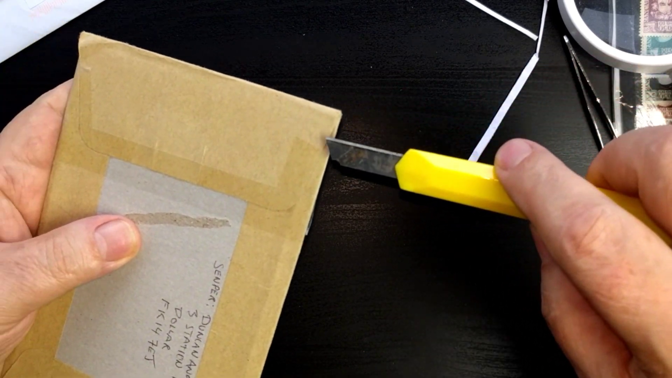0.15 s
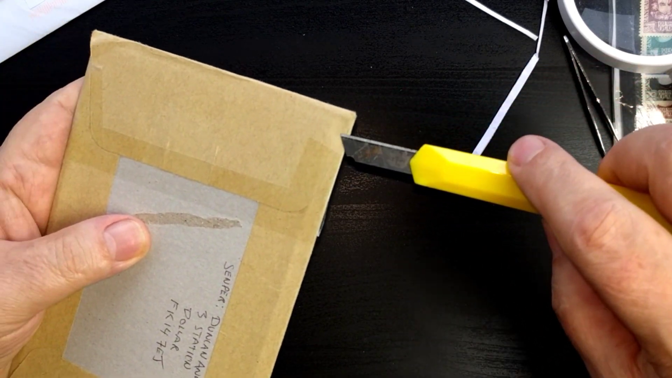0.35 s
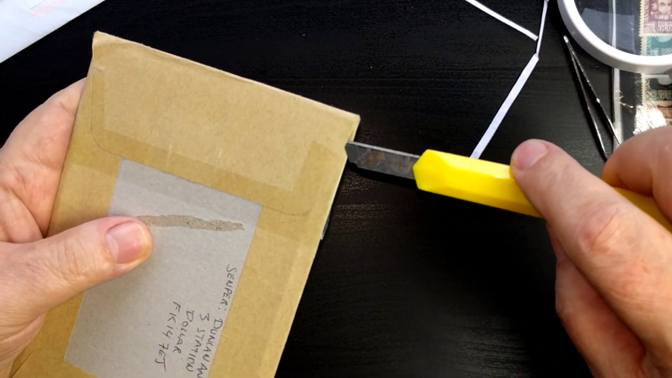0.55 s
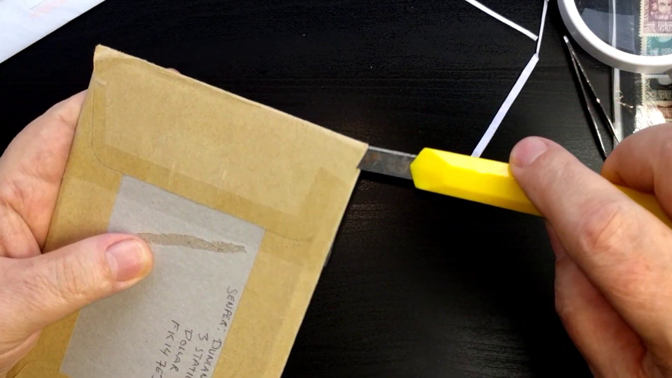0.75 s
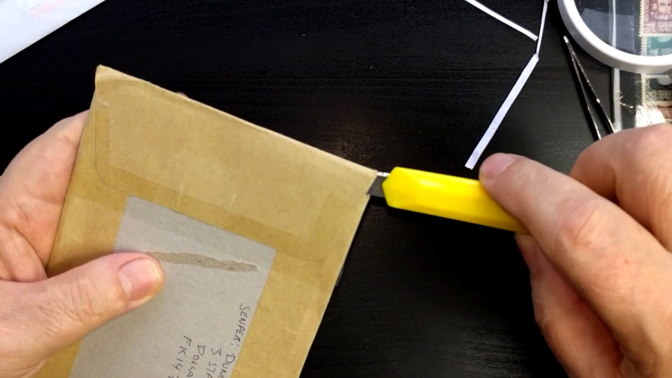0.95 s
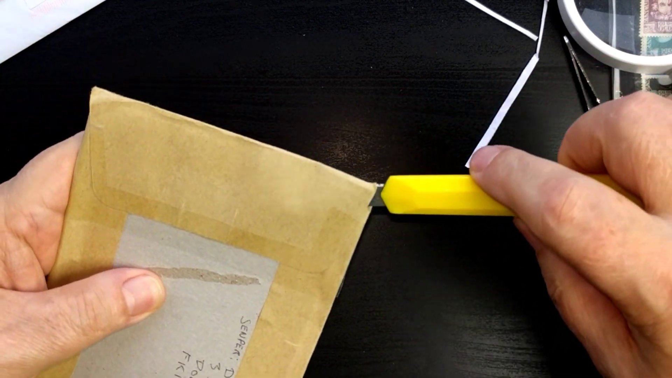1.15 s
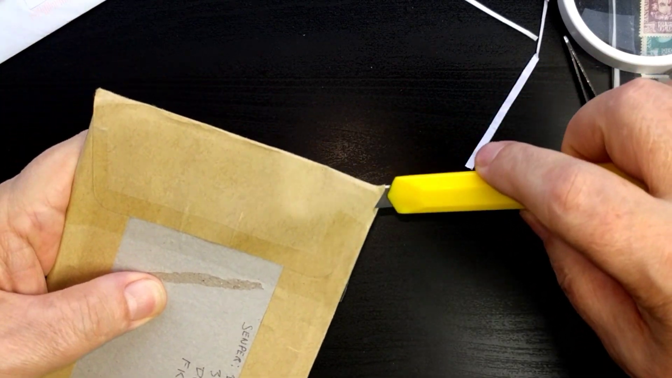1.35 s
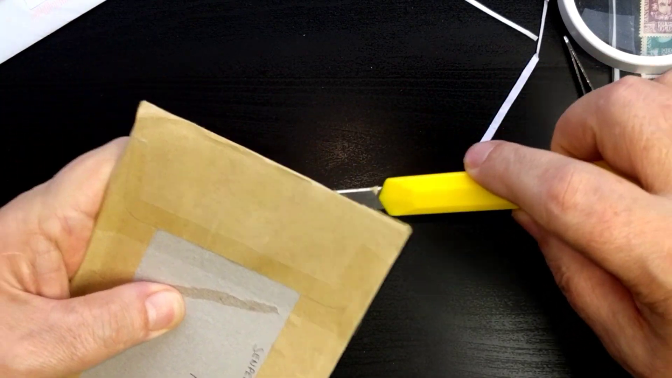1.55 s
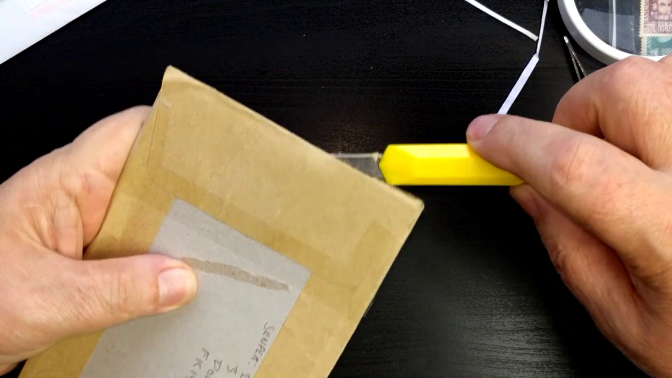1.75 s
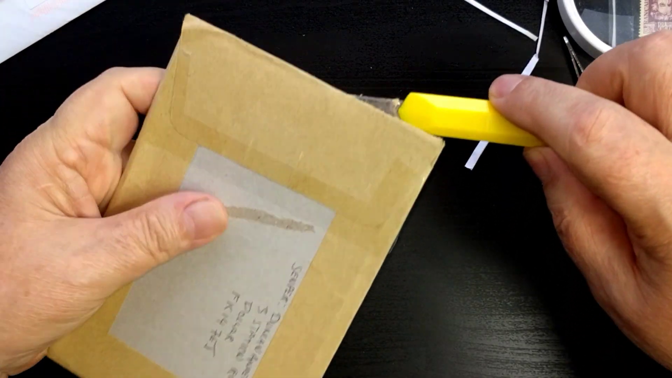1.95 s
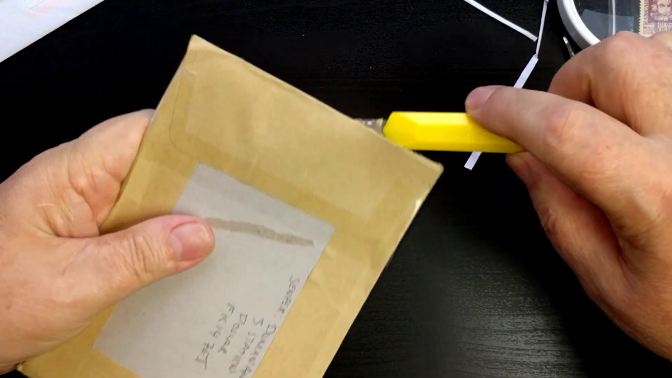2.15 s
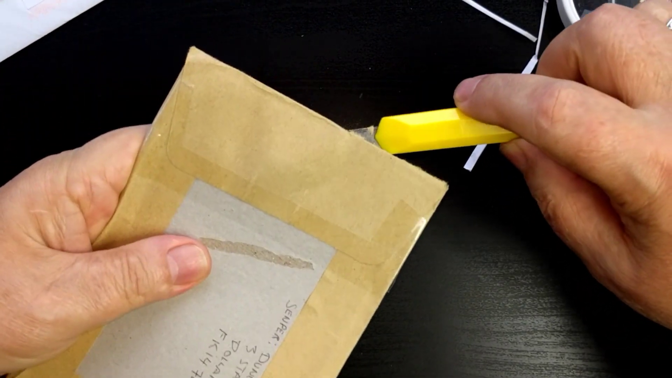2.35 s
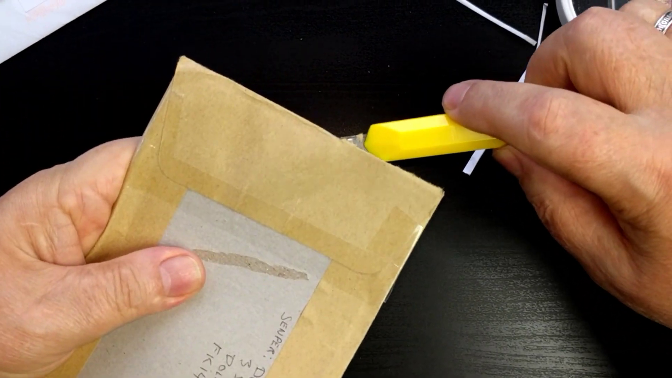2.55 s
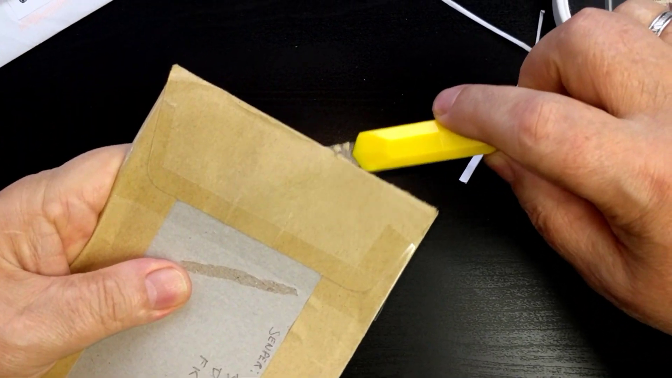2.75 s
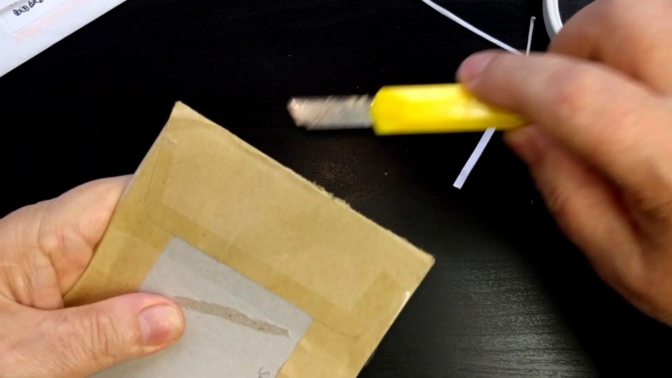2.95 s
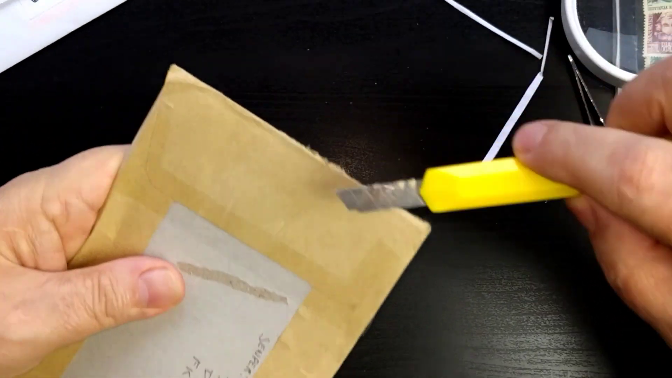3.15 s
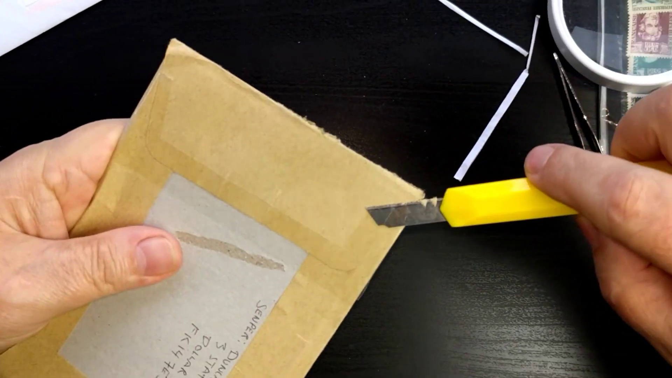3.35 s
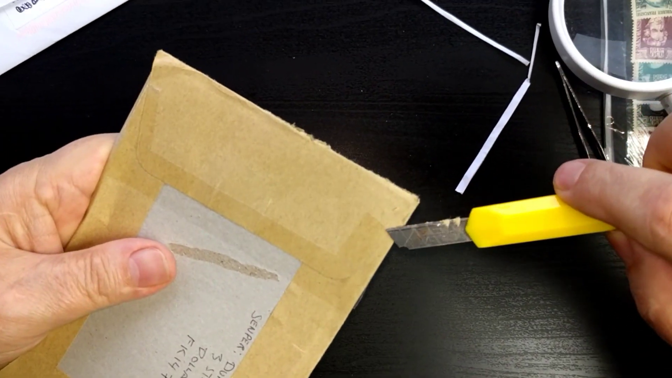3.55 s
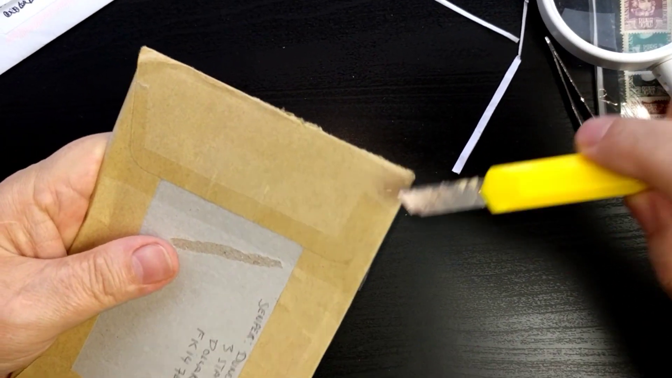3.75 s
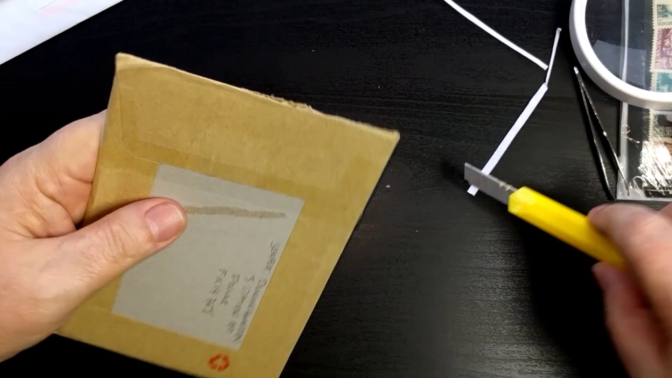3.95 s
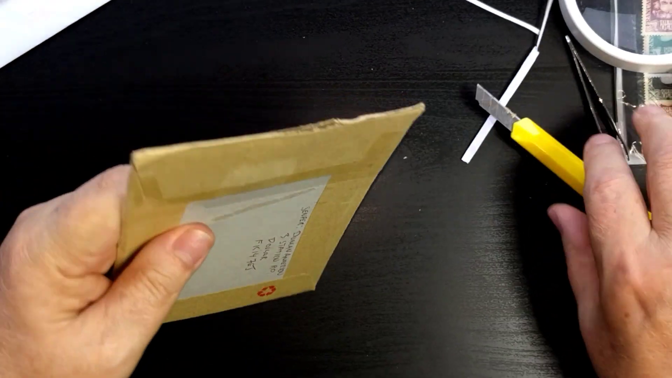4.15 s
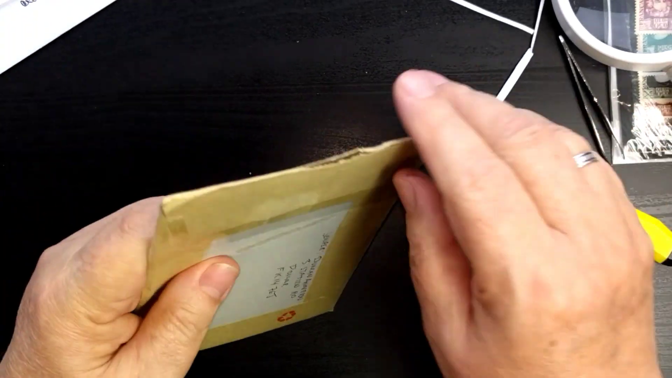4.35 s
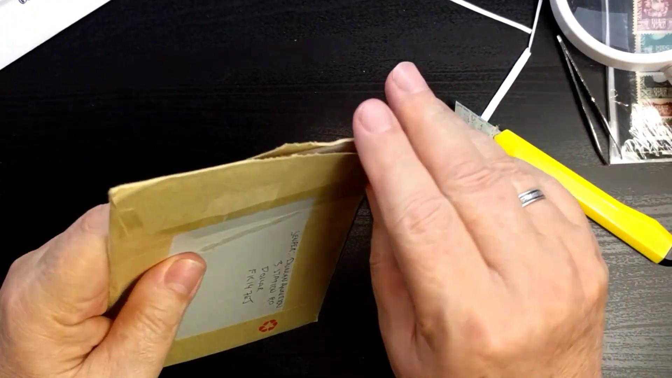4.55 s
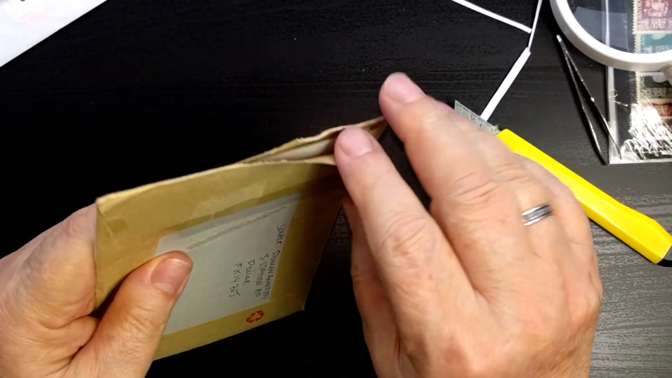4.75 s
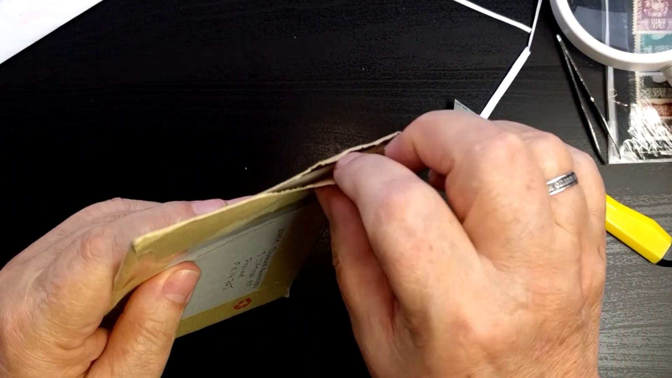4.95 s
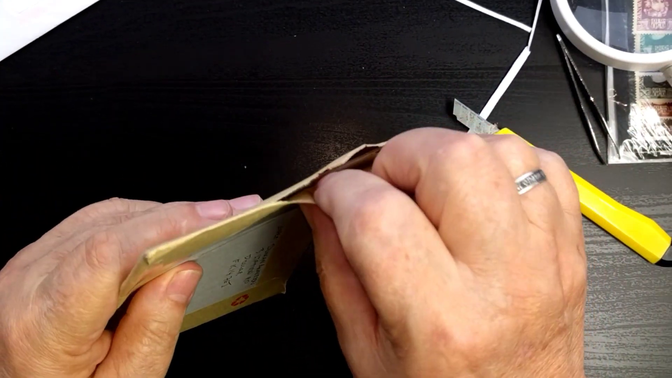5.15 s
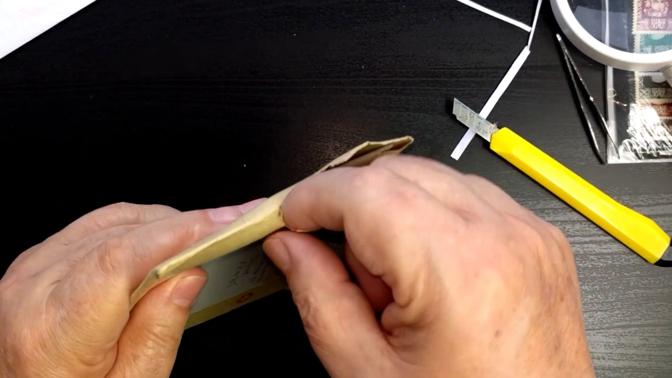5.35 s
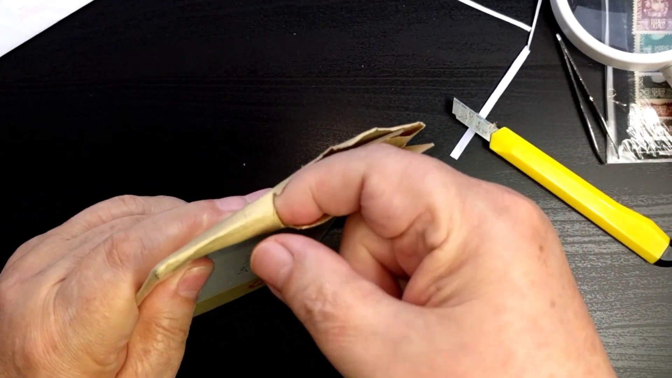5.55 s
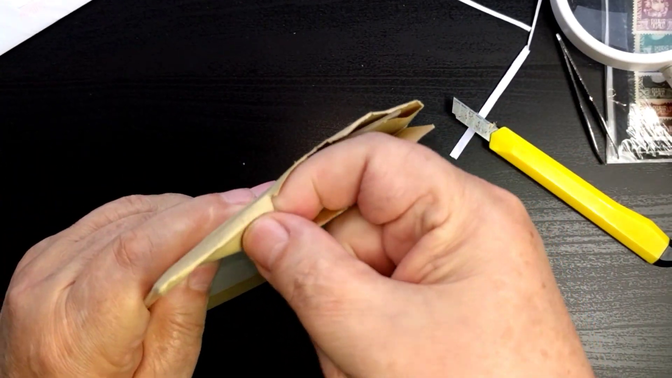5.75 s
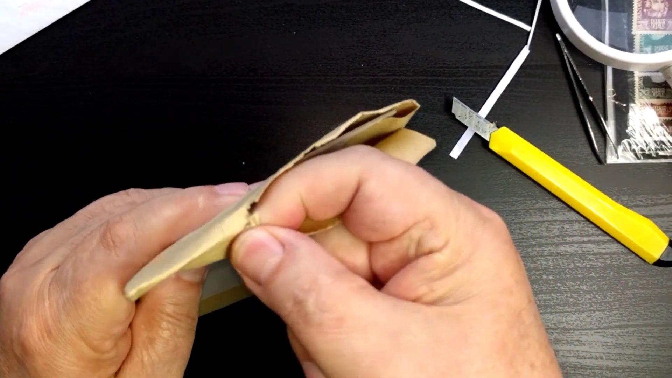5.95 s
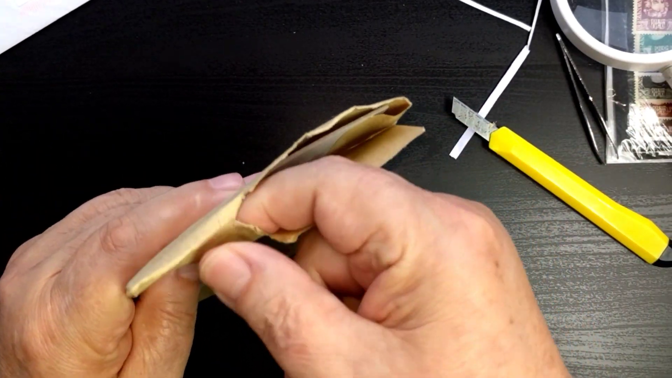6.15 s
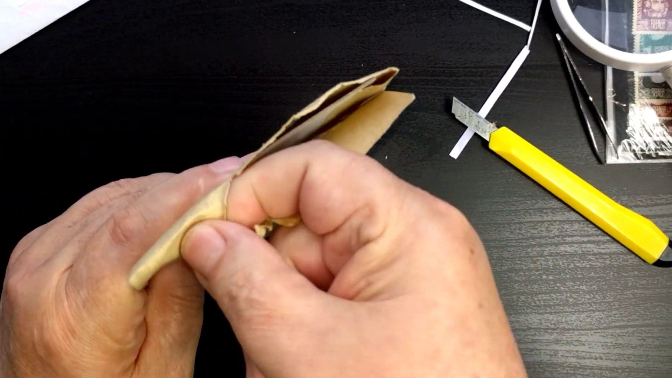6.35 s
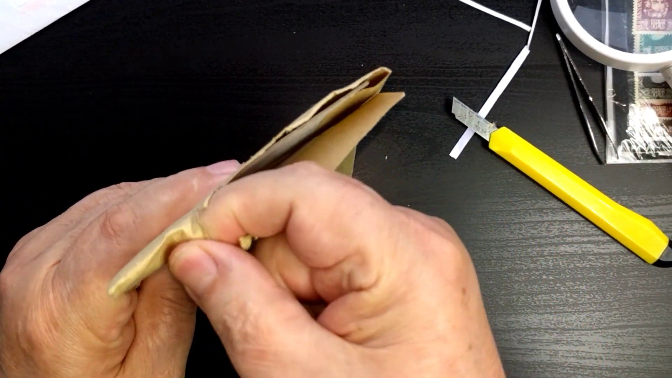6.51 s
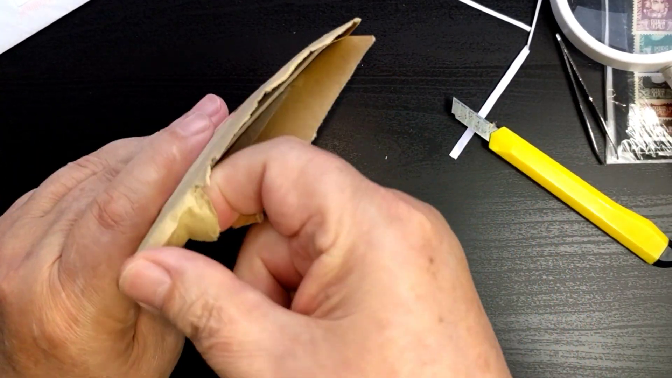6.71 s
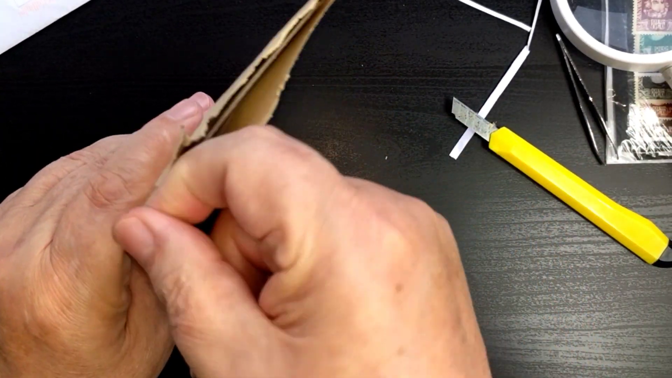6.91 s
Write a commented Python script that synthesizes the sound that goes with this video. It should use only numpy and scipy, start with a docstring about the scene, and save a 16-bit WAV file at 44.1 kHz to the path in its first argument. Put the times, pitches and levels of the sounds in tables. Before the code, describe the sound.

Close blade scrapes and rips in stiff paper, a knife clattering down, then crackling hand tearing, with a low hum behind.

```python
"""Close up, a snap-off knife ticks, slides, saws and rips through the top fold of a stiff paper envelope.
At about 4 s a hand drags over the desk and the knife clatters down.
Fingers then rub the paper and tear it open: fibres snap, the hollow deepens, the wall pops through.
Throughout, a small room answers and a low drone, like a distant engine, wavers behind."""
import sys
import numpy as np
from scipy import signal
from scipy.fft import rfft, irfft, next_fast_len
from scipy.io import wavfile
from scipy.ndimage import map_coordinates

SR = 44100
rng = np.random.default_rng(int(sys.argv[2]) if len(sys.argv) > 2 else 0)


def digitize_waveform(pressure):
    """Quantize a signal to 16-bit integers and store it at the path in sys.argv[1].

    Rows of a 2-D input are taken as channels; values are limited to [-1, 1].
    """
    field = np.atleast_2d(pressure).T
    bounded = np.clip(field, -1, 1)
    quanta = np.round(bounded * 32767).astype(np.int16)
    wavfile.write(sys.argv[1], SR, quanta)


N = 307818

# blade strokes: start_s, end_s, level_db, body_db
SLIDES = [(0.125, 0.23, -50.5, -2), (0.45, 0.525, -53, 4), (0.53, 0.6, -50.5, 2), (0.61, 0.83, -52.5, 2.5),
          (0.82, 0.93, -45.5, -0.5), (0.91, 1.015, -40, -3), (1.06, 1.2, -41.5, 9), (1.17, 1.36, -46, 7.5),
          (1.39, 1.43, -39.5, 2.5), (1.48, 1.515, -27.5, 1), (1.78, 2.03, -48, 8),
          (1.885, 1.975, -47, -6.5), (1.96, 2.24, -44.5, 1.5), (2.1, 2.14, -38.5, -6),
          (2.185, 2.3, -34.5, -1), (2.27, 2.41, -54.5, 7), (2.385, 2.47, -42, 0), (2.76, 2.805, -41, -3),
          (2.91, 3.02, -42, -4), (3.115, 3.19, -51.5, 9), (3.69, 3.76, -48, -1), (3.78, 4.05, -49, 1.5),
          (4.17, 4.24, -37, 1.5)]
# friction spectrum: freq_hz, gain_db
SLIDE_TONE = [(180, -56), (300, -12.5), (678, -12.5), (885, -8.5), (1480, -12), (2170, -6), (3400, -3),
              (5900, -4.5), (6410, -6), (14200, -9), (16000, -9.5)]
def slides():
    """The blade slides in the fold, with tiny gritty catches along each stroke."""
    slide = strokes(SLIDES, SLIDE_TONE, breaks_per_s=3500, spread_db=3.8, hiss=0.44, attack_share=0.56,
                    edge_db=9, judder_db=1.3, ripple_db=1.5, taper=0.43)
    catches = scattered(SLIDES, per_s=17, over_db=-1.5)
    grit = clicks(catches, TICK_TONE, rise_s=0.00026, ripple_db=10.5, ring_db=-32, ring_t60_s=0.015)
    return amp(0.63) * slide + grit


# saw strokes: start_s, end_s, level_db, body_db
CUTS = [(1.592, 1.71, -28, -3), (2.653, 2.732, -37, -1)]
# taut fold resonances: centre_hz, width_hz, gain_db
RASP = [(3350, 400, 9), (4100, 440, 5)]
def sawing():
    """The blade saws steadily; the taut fold rasps under the edge."""
    return amp(1.4) * strokes(CUTS, SLIDE_TONE, breaks_per_s=4700, spread_db=4, hiss=0.62,
                              attack_share=0.38, edge_db=8, judder_db=-0.5, ripple_db=2.4, modes=RASP)


# blade catches: time_s, level_db, body_db
TICKS = [(0.127, -45.5, 5), (0.3089, -27.5, -3), (0.5898, -31.5, 6), (0.8638, -25, -7), (1.0572, -29, 0),
         (1.4685, -41, -4), (1.5385, -17.5, -5), (1.7248, -32, -2), (2.2656, -30.5, -10),
         (2.4228, -22, 0.5), (2.4577, -23.5, 0), (2.5932, -34.5, -12), (2.7608, -31.5, 0),
         (3.1119, -28, -1.5), (3.4, -17.5, -7), (3.6233, -26.5, -8.5), (3.8329, -33, -5),
         (3.8981, -28.5, -10), (3.9899, -31.5, 6), (4.021, -31, -1), (4.0613, -31.5, -2)]
# catch spectrum: freq_hz, gain_db
TICK_TONE = [(150, -60), (250, -17), (510, -18.5), (875, -12.5), (1220, -18), (3120, -4.5), (4050, -9.5),
             (4900, -0.5), (7310, -7.5), (16000, -16)]
def ticks():
    """The blade catches on the paper's edge."""
    return amp(-0.9) * clicks(TICKS, TICK_TONE, rise_s=0.00096, ripple_db=2.6,
                              ring_db=-9, ring_t60_s=0.048, softness=0.99)


# blade glide: time_s, pitch_hz, level_db
ZIP = [(2.654, 2092, -44), (2.68, 3200, -43), (2.701, 3810, -31.5), (2.732, 4950, -54)]
def zipping(width_hz=2500):
    """A rough band glides upward as the blade gathers speed."""
    time_s, pitch_hz, level_db = np.transpose(ZIP)
    out, t = np.zeros(N), np.arange(time_s[0], time_s[-1], 1 / SR)
    phase = 2 * np.pi * np.cumsum(np.interp(t, time_s, pitch_hz)) / SR
    band = wobble(width_hz, len(t)) * np.sin(phase) + wobble(width_hz, len(t)) * np.cos(phase)
    swell = amp(np.interp(t, time_s, level_db)) * signal.windows.tukey(len(t), 0.1)
    add(out, time_s[0], swell * unit(band))
    return out


# fold giving way: start_s, end_s, level_db, body_db
RIPS = [(0.164, 0.182, -29, -2), (1.497, 1.516, -22, -1), (1.511, 1.525, -25.5, -2.5),
        (1.524, 1.538, -22.5, -3.5), (1.756, 1.768, -33.5, 0), (1.77, 1.78, -29, -1.5),
        (2.861, 2.926, -21.5, 0), (2.894, 2.906, -20, -7), (5.404, 5.42, -26.5, 2), (6.451, 6.469, -25, 8),
        (6.604, 6.618, -36, -0.5), (6.881, 6.892, -20.5, 5), (6.891, 6.904, -22, 1.5)]
# rip spectrum: freq_hz, gain_db
RIP_TONE = [(90, -24), (150, -15), (328, -19.5), (805, -8.5), (1080, -13), (1750, -7.5), (3400, -2.5),
            (4490, -5.5), (5400, -1), (6200, -5), (13400, -5.5), (16000, -7.5)]
# fold tension as the slit grows: time_s, taut_share
TAUTNESS = [(1.6, 1), (2.8, 0)]
def rips():
    """Dense, surging runs of breaks ring the taut fold or, once it is open, the hollow."""
    out = np.zeros(N)
    for start_s, end_s, level_db, body_db in RIPS:
        size = round((end_s - start_s) * SR)
        surge = amp(2.9 * wobble(347, size)) * signal.windows.tukey(size, min(1, 0.0074 * SR / size))
        drive = unit(surge * fibres(size, breaks_per_s=6000, spread_db=4.5, hiss=0.45))
        if openness(start_s):
            modes, depth = hollow(start_s), 0.7
        else:
            modes, depth = RASP, 0.55 * np.interp(start_s, *np.transpose(TAUTNESS))
        response = impulse_response(RIP_TONE, body_db, ripple_db=2.1, modes=modes, depth=depth)
        add(out, start_s, amp(level_db) * signal.fftconvolve(drive, response))
    return amp(0.03) * out


# finger strokes: start_s, end_s, level_db, body_db
RUBS = [(4.578, 4.704, -51.5, 0), (4.711, 4.81, -46, -0.5), (4.844, 4.972, -45, -2.5),
        (4.965, 5.115, -47.5, 0), (5.108, 5.247, -44, -4), (5.236, 5.385, -41, -3), (5.828, 5.88, -43, 2.5),
        (5.953, 6.034, -38.5, 3.5), (6.131, 6.252, -45, 3), (6.674, 6.796, -33.5, 1.5),
        (6.816, 6.965, -35.5, -1)]
# envelope shifting: start_s, end_s, level_db, body_db
HANDLING = [(4.7, 7.1, -50, 6.5)]
# rub spectrum: freq_hz, gain_db
RUB_TONE = [(210, -49), (350, -7), (1140, -9), (1650, -4.5), (2940, -6), (4600, -5), (11800, -6),
            (14500, -3.5), (16000, -9.5)]
def rubbing():
    """Skin and paper rub on paper while the envelope shifts faintly between the hands."""
    rub = sum(strokes([row], RUB_TONE, breaks_per_s=1300, spread_db=1.5, hiss=0.62, attack_share=0.31,
                      edge_db=8, judder_db=1.5, ripple_db=-0.05,
                      modes=hollow(row[0]), depth=openness(row[0])) for row in RUBS)
    shifting = strokes(HANDLING, RUB_TONE, breaks_per_s=260, spread_db=3, hiss=0.83, attack_share=0.77,
                       edge_db=13, judder_db=3.5, ripple_db=-1, modes=hollow(HANDLING[0][1]), depth=0.48)
    return amp(0.87) * rub + shifting


# finger tears: start_s, end_s, level_db, body_db
TEARS = [(5.362, 5.5, -33, -1.5), (5.531, 5.643, -33, 0), (5.641, 5.809, -47, 5.5),
         (6.024, 6.107, -38.5, -9), (6.173, 6.243, -31.5, -6.5), (6.3, 6.434, -35, -4.5),
         (6.425, 6.512, -29.5, 2.5)]
# tear spectrum: freq_hz, gain_db
TEAR_TONE = [(210, -35), (350, -8), (530, -6), (990, -15.5), (2200, 0.5), (3980, -2.5), (7080, -2.5),
             (9290, -6), (13600, 2), (16000, 1.5)]
# crease and bundle breaks: time_s, level_db, body_db
SNAPS = [(5.4259, -15, -0.5), (5.4362, -20, -7), (5.4685, -36, -11), (5.5312, -19.5, 5), (5.5533, -27, -10),
         (5.5643, -21.5, -7.5), (5.7252, -27.5, 2), (6.04, -7.5, 6), (6.0469, -15, -12), (6.054, -22, -8),
         (6.2182, -24, 2), (6.2417, -25.5, -4), (6.31, -21, -5), (6.3165, -17, -10), (6.337, -23, -10),
         (6.3636, -12, -0.5), (6.3827, -19, 0.5), (6.512, -14.5, 11.5), (6.8406, -26, 7),
         (6.8694, -21.5, 4)]
# snap spectrum: freq_hz, gain_db
SNAP_TONE = [(100, -38), (400, -6.5), (1000, -7.5), (2400, -5), (4500, -11.5), (7000, -5.5), (10000, -6),
             (14000, -1.5), (16000, 1.5)]
def tearing():
    """A finger tears the fold fibre by fibre; creases and fibre bundles snap and crackle."""
    tear = sum(strokes([row], TEAR_TONE, breaks_per_s=520, spread_db=3.3, hiss=0.43, attack_share=0.48,
                       edge_db=7, judder_db=1.5, ripple_db=2.2, modes=hollow(row[0]), depth=0.53)
               for row in TEARS)
    snaps = sum(clicks([row], SNAP_TONE, rise_s=0.0004, ripple_db=4.5, ring_db=-14, ring_t60_s=0.039,
                       modes=hollow(row[0]), depth=0.52) for row in SNAPS)
    small_snaps = scattered(TEARS, per_s=42, over_db=4)
    crackle = clicks(small_snaps, SNAP_TONE, rise_s=0.00017, ripple_db=4, ring_db=-28, ring_t60_s=0.015)
    return amp(0.2) * tear + amp(0.1) * snaps + crackle


# envelope mouth: time_s, open_share
OPENING = [(5.0, 0), (6.1, 1)]
def openness(time_s):
    """How far the mouth is open, 0 to 1."""
    return np.interp(time_s, *np.transpose(OPENING))


# cavity resonances: shut_hz, open_hz, width_hz, gain_db
HOLLOW = [(2270, 2120, 240, 9), (3620, 2955, 380, 14)]
def hollow(time_s):
    """The envelope's cavity resonances fall as it opens."""
    return [(shut_hz + (open_hz - shut_hz) * openness(time_s), width_hz, gain_db)
            for shut_hz, open_hz, width_hz, gain_db in HOLLOW]


# envelope jerks: time_s, level_db, centre_hz
POPS = [(1.112, -32.5, 1550), (2.4558, -34.5, 1120), (2.759, -39.5, 322), (5.6142, -29, 490),
        (6.0405, -31.5, 620)]
# pop spectrum: centre_ratio, gain_db
POP_TONE = [(.2, -31), (.65, 0.5), (1.25, 3), (2, -10.5), (6, -12.5), (30, -52)]
def pops():
    """The envelope jerks in the grip with dull, unpitched puffs."""
    out = np.zeros(N)
    for time_s, level_db, centre_hz in POPS:
        tone = [(centre_hz * ratio, gain_db) for ratio, gain_db in POP_TONE]
        out += clicks([(time_s, level_db, 0)], tone, rise_s=0.0018, ripple_db=4,
                      ring_db=-35, ring_t60_s=0.018)
    return out


# envelope wall modes: freq_hz, gain_db, t60_s
WALL_MODES = [(1280, -16, 0.0094), (2000, -3.5, 0.012), (2174, 0.5, 0.017), (2650, -0.5, 0.011),
              (5600, -2.5, 0.0035), (6170, -11, 0.0097)]
def buckle(time_s=6.1172, gain_db=-10):
    """The bowed wall flips over and rings briefly."""
    out, t = np.zeros(N), np.arange(SR // 10) / SR
    ring = sum(amp(db - 60 * t / t60_s) * np.sin(2 * np.pi * hz * t) for hz, db, t60_s in WALL_MODES)
    attack = 1 - np.exp(-t / 0.00016)
    add(out, time_s, amp(gain_db) * ring * attack)
    return out


# hand drag: start_s, end_s, level_db, body_db
DRAGS = [(3.5, 4.1, -52, 2.5)]
# desk top resonances: centre_hz, width_hz, gain_db
DESK_MODES = [(450, 210, 14), (1456, 91, 15.5), (1780, 180, 13.5), (2530, 310, 4.5)]
def hand_drag():
    """The hand judders over the desk and excites its top."""
    return strokes(DRAGS, SLIDE_TONE, breaks_per_s=2600, spread_db=15, hiss=0.69, attack_share=0.86,
                   edge_db=7, judder_db=6, ripple_db=0.5, modes=DESK_MODES)


# knife on desk: time_s, level_db
KNIFE_HITS = [(4.1025, -11), (4.1367, -26.5), (4.2355, -10), (4.2466, -11.5), (4.3139, -14.5),
              (4.3379, -19), (4.3569, -22), (4.4268, -20)]
# contact spectrum: freq_hz, gain_db
KNIFE_TONE = [(88, -19), (160, -15), (300, -8), (566, -15), (830, -10.5), (1250, -9.5), (1830, -3),
              (5150, -4), (11000, -5.5), (16000, -4.5)]
# handle and blade resonances: centre_hz, width_hz, gain_db
KNIFE_MODES = [(2380, 600, 2), (5230, 750, 4.5), (8750, 800, 5.5)]
def knife_clatter(first_body_db=-6.5, body_db_per_s=45.5):
    """The knife rocks to rest, steel tip first, then plastic handle: each contact is duller."""
    contacts = [(time_s, level_db, first_body_db + body_db_per_s * (time_s - KNIFE_HITS[0][0]))
                for time_s, level_db in KNIFE_HITS]
    return clicks(contacts, KNIFE_TONE, rise_s=0.0021, ripple_db=2, ring_db=-7.5, ring_t60_s=0.092,
                  softness=1.6, modes=KNIFE_MODES)


# room decay: freq_hz, t60_s
ROOM_T60 = [(300, 0.96), (1000, 0.46), (5000, 0.3346), (15000, 0.22)]
# room spectrum: freq_hz, gain_db
ROOM_TONE = [(200, -5.5), (1000, 3), (2500, -2.5), (5500, -1.5), (9000, -2), (16000, -1)]
def room(x, spans=28, delay_s=0.005):
    """A diffuse tail, each frequency dying at its own speed, drawn afresh per span to stay smooth."""
    out = np.zeros(N)
    for span in np.array_split(np.arange(N), spans):
        hz, t, noise = signal.stft(rng.standard_normal(SR // 2), SR, nperseg=256)
        decay = amp(along(ROOM_TONE, hz)[:, None] - 60 * t / along(ROOM_T60, hz)[:, None])
        tail = signal.istft(noise * decay, SR, nperseg=256)[1]
        add(out, span[0] / SR + delay_s, signal.fftconvolve(x[span], tail / np.linalg.norm(tail)))
    return out


# drone contour: time_s, tone_db, boom_db
DRONE = [(0.0, -59, -52.5), (0.13, -65.5, -56.5), (2.59, -69, -62.5), (3.13, -53, -57), (3.32, -68, -61.5),
         (4.06, -44, -54.5), (4.28, -54, -50.5), (5.64, -49, -47), (5.93, -41, -47.5), (6.36, -50.5, -43),
         (6.78, -49, -44.5), (6.98, -42, -48)]
# rumble and hiss spectrum: freq_hz, gain_db
FLOOR_TONE = [(24, -32), (34, -13), (44, 6), (65, -9), (100, -4.5), (190, -11), (280, -18.5), (500, -25.5),
              (3100, -29), (4500, -33.5), (16000, -35)]
def background(pitch_hz=74.4, waver_share=0.0384):
    """A wavering low tone with a narrow boom above it, over room rumble and hiss."""
    time_s, *contours = np.transpose(DRONE)
    tone_db, boom_db = [np.interp(np.arange(N) / SR, time_s, contour) for contour in contours]
    phase = 2 * np.pi * np.cumsum(pitch_hz * (1 + waver_share * wobble(15, N))) / SR
    tone = amp(tone_db - 0.5 + 1.2 * wobble(14, N)) * np.sqrt(2) * np.sin(phase)
    # freq_hz, gain_db
    boom_tone = [(110, -51), (150, -0.5), (175, -12), (193, -3.5), (220, -5.5), (260, -22), (400, -25.5)]
    boom = unit(filtered(rng.standard_normal(N), lambda hz: amp(along(boom_tone, hz)) * (hz < 500)))
    floor = unit(filtered(rng.standard_normal(N), lambda hz: amp(along(FLOOR_TONE, hz))))
    return tone + amp(boom_db - 2) * boom + amp(-54) * floor


def strokes(rows, tone, breaks_per_s, spread_db, hiss, attack_share, edge_db, judder_db, ripple_db,
            modes=(), depth=1, taper=0.22):
    """Friction swells and fades over each stroke, juddering as the grip changes."""
    out = np.zeros(N)
    for start_s, end_s, level_db, body_db in rows:
        size = round((end_s - start_s) * SR)
        arch_db = np.interp(np.linspace(0, 1, size), [0, attack_share, 1], [-edge_db, 0, -edge_db])
        grip_db = judder_db * wobble(130, size) + 2.54 * wobble(33.89, size)
        swell = amp(arch_db + grip_db) * signal.windows.tukey(size, taper)
        drive = fibres(size, breaks_per_s, spread_db, hiss) * swell
        response = impulse_response(tone, body_db, ripple_db, modes, depth)
        add(out, start_s, amp(level_db) * signal.fftconvolve(drive, response))
    return out


def fibres(size, breaks_per_s, spread_db, hiss):
    """Fibres let go at random times and strengths; hiss is the power share of smooth friction."""
    breaks = (rng.random(size) < breaks_per_s / SR) * rng.choice([-1, 1], size)
    strength = amp(spread_db * np.minimum(rng.exponential(size=size), 3))
    return np.sqrt(1 - hiss) * unit(breaks * strength) + np.sqrt(hiss) * rng.standard_normal(size)


def clicks(rows, tone, rise_s, ripple_db, ring_db, ring_t60_s, softness=1, modes=(), depth=1):
    """Each contact is a short crack and a weak, unpitched ring; softness rounds the onset."""
    out, t = np.zeros(N), np.arange(SR // 8) / SR
    rise = t / rise_s
    crack = (rise * np.exp(1 - rise)) ** softness
    ring = amp(ring_db - 60 * t / ring_t60_s) * (1 - np.exp(-rise)) ** softness
    for time_s, level_db, body_db in rows:
        for shape, ripple in [(crack, ripple_db), (ring, 0)]:
            drive = shape * rng.standard_normal(len(t))
            burst = signal.fftconvolve(drive, impulse_response(tone, body_db, ripple, modes, depth))
            add(out, time_s, amp(level_db) * burst * np.linalg.norm(shape) / np.linalg.norm(burst))
    return out


def scattered(rows, per_s, over_db, spread_db=2):
    """Random clicks within each stroke: time_s, level_db, body_db."""
    return [(start_s + (end_s - start_s) * when, level_db + over_db + spread_db * (2 * force - 1), body_db)
            for start_s, end_s, level_db, body_db in rows
            for when, force in rng.random((round(per_s * (end_s - start_s)), 2))]


def impulse_response(tone, body_db, ripple_db, modes, depth, size=1024):
    """Unit-energy response of one touch point: tone, low shelf (body_db), modes and random ripple."""
    hz = np.fft.rfftfreq(size, 1 / SR)
    db = along(tone, hz) + body_db * along([(3400, 1), (5800, 0.039)], hz)
    db += depth * sum(gain / (1 + (2 * (hz - centre) / width) ** 2) for centre, width, gain in modes)
    db += ripple_db * map_coordinates(rng.standard_normal(size), [np.sqrt(hz) / 3])
    # minimum phase
    cepstrum = irfft(np.log(amp(np.maximum(db, -70))))
    cepstrum[1:size // 2] *= 2
    cepstrum[size // 2 + 1:] = 0
    response = irfft(np.exp(rfft(cepstrum)))
    return response / np.linalg.norm(response)


def amp(db):
    """Decibels to gain."""
    return 10 ** (np.asarray(db) / 20)


def unit(x):
    """x at rms 1."""
    return x / np.sqrt(np.mean(x ** 2) + 1e-20)


def along(points, hz):
    """Interpolate (freq_hz, value) points on a log axis."""
    freq_hz, values = np.transpose(points)
    return np.interp(np.log(hz + 1), np.log(freq_hz + 1), values)


def wobble(knots_per_s, size):
    """A smooth random curve."""
    knots = rng.standard_normal(int(size * knots_per_s / SR) + 4)
    return map_coordinates(knots, [np.arange(size) * knots_per_s / SR + 1])


def filtered(x, response):
    """Apply the gain response(hz) to x."""
    size = next_fast_len(len(x) + 8192)
    return irfft(rfft(x, size) * response(np.fft.rfftfreq(size, 1 / SR)), size)[:len(x)]


def add(track, start_s, x):
    """Mix x into the track."""
    part = track[round(start_s * SR):][:len(x)]
    part += x[:len(part)]


def scene():
    """The envelope is near the microphone; the knife lands farther off, with more room."""
    blade = slides() + sawing() + ticks() + zipping()
    envelope = blade + rips() + rubbing() + tearing() + pops() + buckle()
    desk = hand_drag() + knife_clatter()
    reverb = room(amp(-13.5) * envelope + amp(-6.5) * desk)
    return (envelope + desk + reverb + background())[None]


TOP_HZ = 16000
def record(dry):
    """Brick-wall low-pass."""
    return np.array([filtered(channel, lambda hz: hz < TOP_HZ) for channel in dry])


dry = scene()
out = record(dry)
digitize_waveform(out)
```